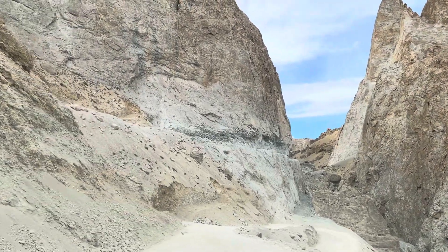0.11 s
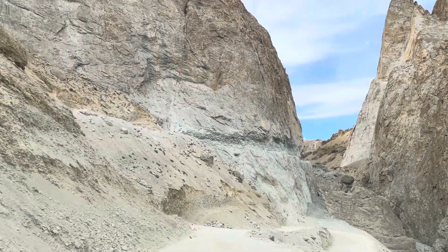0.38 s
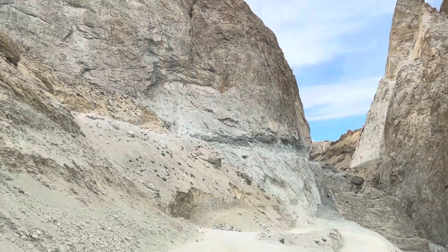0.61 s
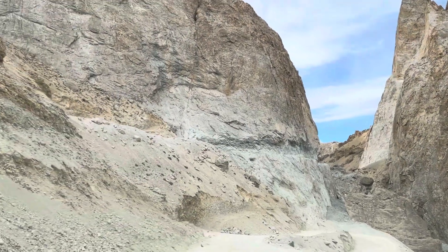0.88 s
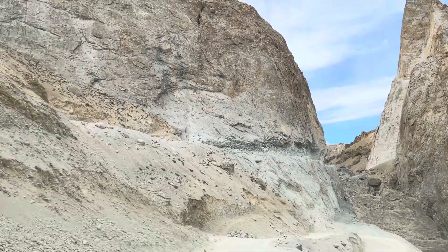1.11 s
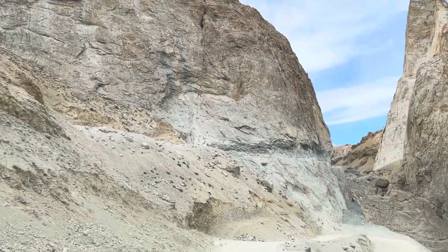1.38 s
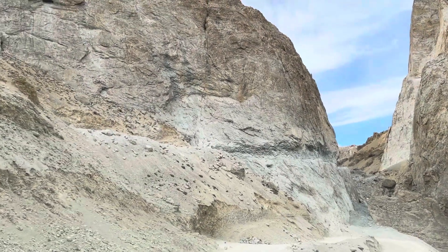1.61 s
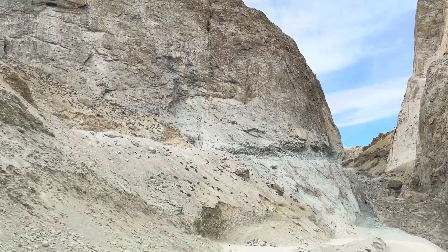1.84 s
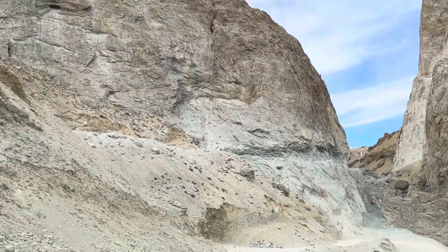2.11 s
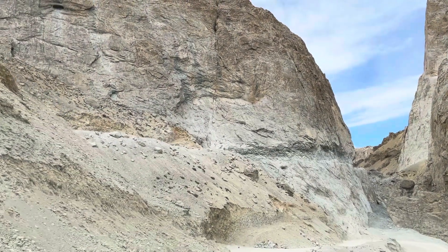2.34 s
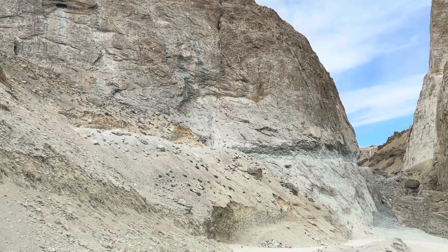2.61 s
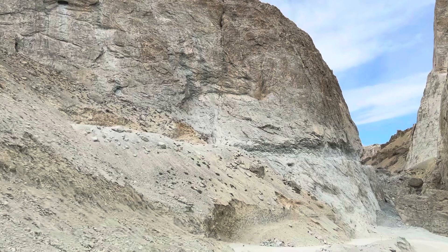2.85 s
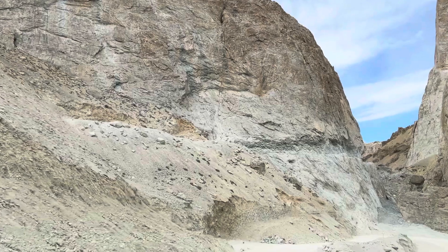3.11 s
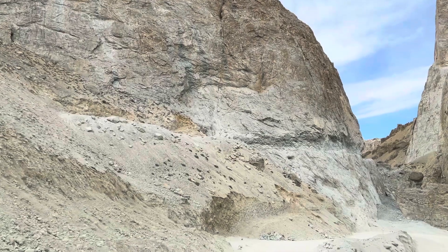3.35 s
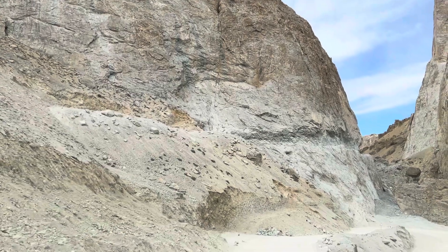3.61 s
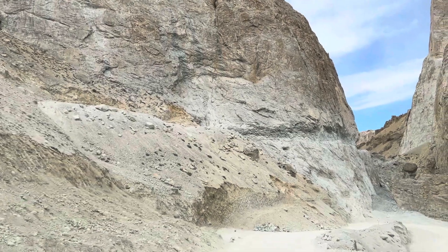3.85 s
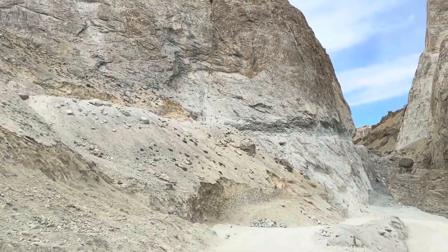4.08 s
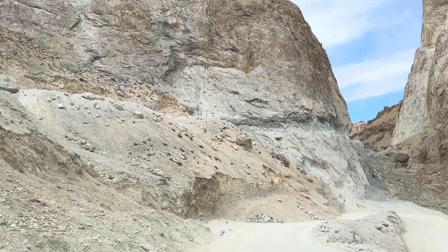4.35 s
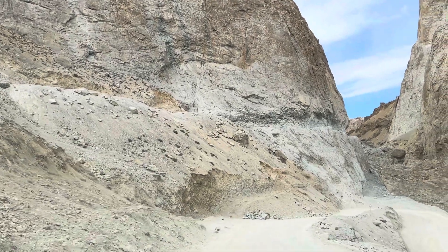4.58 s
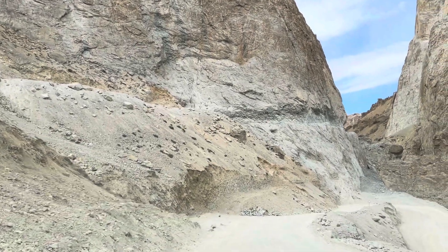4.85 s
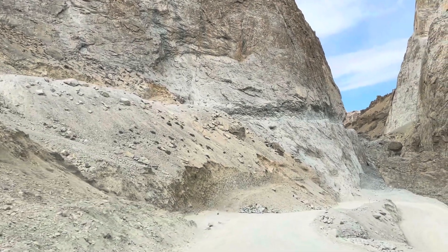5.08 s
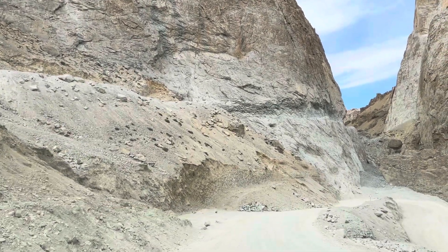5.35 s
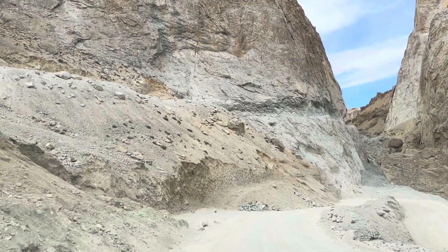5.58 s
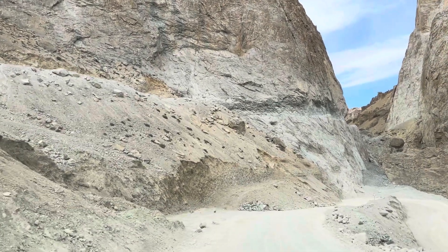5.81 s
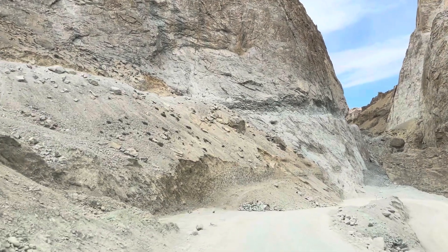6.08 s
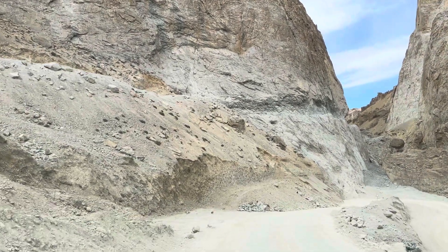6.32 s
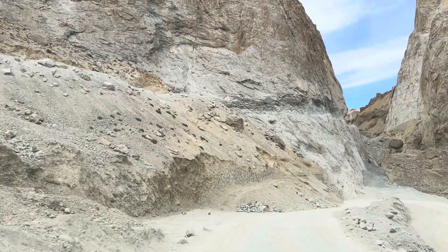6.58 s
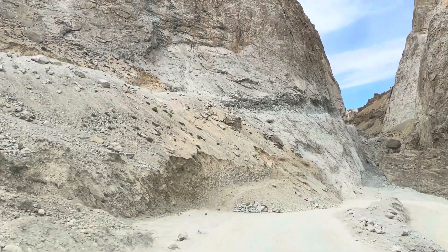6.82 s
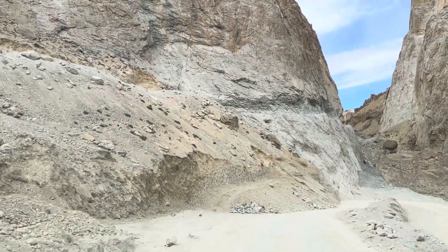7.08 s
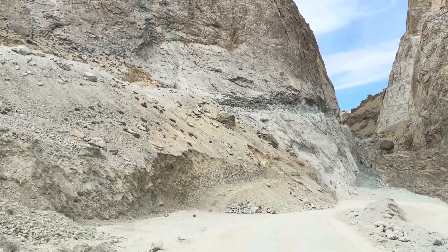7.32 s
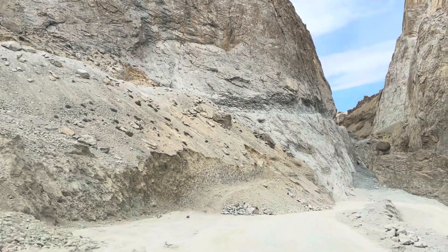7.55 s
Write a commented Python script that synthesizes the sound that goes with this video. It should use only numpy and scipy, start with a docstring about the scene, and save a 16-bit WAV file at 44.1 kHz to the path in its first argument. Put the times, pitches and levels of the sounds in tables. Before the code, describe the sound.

Inside a vehicle moving steadily on a rough gravel road, for about 7.7 seconds. A deep boom near 60 hertz wavers in pitch and strength, swelling around 1.1, 2.4, 4.3 and 6 seconds, over constant low body shake. Tyre rumble and gritty hiss rise and fall with the surface, brighter around 1.6, duller just after 3.2, rougher near 5 to 5.5. Stones clack and crunch on the floor throughout, with brief dry rings. Soft thumps land at 1.1 and 1.9, bunch from 2.5 to 3, then return at 5, 5.5 and 7.5. Tiny metal jingles appear at 0.4, 0.9, 2.1, 3, 5 and 7.3; a loose fitting ticks in little runs, clearest at 4.3 to 5.4. A faint gear whine glides upward at 1.25 to 2, then returns higher from 6.75, dipping before rising to the end. Close, dry stereo cabin sound.

```python
"""Cabin on a rough gravel road

Heard inside a rolling vehicle. The cabin booms as a wavering low sine; the body's shake and the tyres' rumble
and hiss are shaped noise. Stones knock the floor pan, small metal parts jingle, a loose fitting ticks and bumps
thump the body: all are clicks that ring short modes. A gear whines faintly in two stretches, as a gliding sine."""
import sys
import numpy as np
from scipy import signal
from scipy.fft import rfft, irfft
from scipy.io import wavfile

SR = 44100
rng = np.random.default_rng(int(sys.argv[2]) if len(sys.argv) > 2 else 0)


def generate_wav(signal):
    """Clip the signal to [-1, 1] and save it as 16-bit WAV at the path in sys.argv[1]."""
    frames = np.transpose(np.atleast_2d(signal))
    scaled = np.clip(frames, -1, 1) * 32767
    pcm = np.round(scaled).astype(np.int16)
    wavfile.write(sys.argv[1], SR, pcm)


def convert_level_to_amplitude(level_db):
    """Map a level in decibels to its linear amplitude factor."""
    exponent = np.asarray(level_db, float) / 20
    return 10 ** exponent


N = 339129

# roughness of the road, as the level of the gravel hiss: t/s, level/dB
ROUGHNESS_LEVEL = [(0.0, -51), (0.96, -54.5), (1.201, -47), (1.451, -56.5), (1.619, -52.5), (1.9, -51.5),
                   (2.97, -55), (3.221, -57), (3.92, -56.5), (4.399, -52), (4.849, -54), (4.961, -48),
                   (5.15, -46), (5.27, -55), (5.55, -46), (5.68, -60), (5.97, -51.5), (6.427, -57),
                   (7.69, -48.5)]


def in_time(rows):
    """Table columns joined by straight lines, one value a sample."""
    s, *columns = np.transpose(rows)
    return [np.interp(np.arange(N) / SR, s, c) for c in columns]


def at_hz(points, hz):
    """A spectrum read on a log-frequency axis."""
    point_hz, values = np.transpose(points)
    return np.interp(np.log(hz), np.log(point_hz), values)


def rms_one(x):
    """Scaled to unit power."""
    return x / np.sqrt(np.mean(x ** 2) + 1e-20)


def drift(rate_hz):
    """Slow random wandering of spread 1: noise through two equal low-pass poles at rate_hz."""
    every = 40  # samples from one drawn value to the next
    r = np.exp(-2 * np.pi * rate_hz * every / SR)
    settle = 2000
    white = rng.standard_normal(N // every + 2 + settle)
    slow = signal.lfilter([1], [1, -2 * r, r * r], white)[settle:]
    return np.interp(np.arange(N) / every, np.arange(len(slow)), rms_one(slow))


def ring(clicks, hz, t60, lead=0.):
    """A unit click sets a decaying sine of height 1 ringing, its phase advanced by lead (rad)."""
    r = convert_level_to_amplitude(-60 / (max(t60, .002) * SR))
    w = 2 * np.pi * hz / SR
    return signal.lfilter([np.sin(lead), r * np.sin(w - lead)], [1, -2 * r * np.cos(w), r * r], clicks + 1e-18)


def tone(hz, level_db, waver_hz, flutter_db, rate_hz):
    """A sine that wavers in pitch and flutters in level."""
    phase = 2 * np.pi * np.cumsum(hz + waver_hz * drift(rate_hz)) / SR
    return np.sqrt(2) * convert_level_to_amplitude(level_db + flutter_db * drift(rate_hz)) * np.sin(phase)


def coloured(spectrum, mid_side_noise, patchy_db, rate_hz):
    """Stereo noise in overlapping octave patches that flicker, its left-right likeness set by pitch; rms 1."""
    # left-right likeness of the noise: f/Hz, correlation (-1 to 1)
    likeness = [(60, 0.96), (120, 0.98), (250, 0.74), (520, 0.071), (1080, -0.63), (2220, 0.32),
                (4560, 0.21), (9390, 0.24)]
    low_hz, high_hz = spectrum[0][0], spectrum[-1][0]
    hz = np.maximum(np.fft.rfftfreq(N, 1 / SR), 1)
    alike = np.clip(at_hz(likeness, hz), -1, 1)
    inside = (hz > low_hz) & (hz < high_hz)
    shaped = rfft(mid_side_noise) * convert_level_to_amplitude(at_hz(spectrum, hz)) * inside
    mid, side = shaped * np.sqrt([1 + alike, 1 - alike])
    left_right = np.array([mid + side, mid - side])
    out, together = 0, drift(rate_hz)
    for centre in low_hz * 2. ** np.arange(np.log2(high_hz / low_hz) + 1):
        patch = np.cos(np.pi / 2 * np.clip(np.log2(hz / centre), -1, 1)) ** 2
        flicker_db = patchy_db * (together + 1.43 * drift(rate_hz))
        out = out + irfft(patch * left_right, N) * convert_level_to_amplitude(flicker_db)
    return rms_one(out)


def boom():
    """Cabin air and floor boom as one low sine, nearly even at the two ports."""
    # path of the boom: t/s, f/Hz, level/dB
    boom_path = [(0, 59.8, -18.5), (.3, 59.76, -24), (.6, 54.2, -22.5), (.86, 60.3, -24),
                 (1.11, 60.23, -14.5), (1.5, 63.54, -25), (1.85, 61, -19.5), (2.05, 59.95, -22.5),
                 (2.4, 62.09, -16), (2.96, 55.76, -22), (3.6, 65, -27), (4.1, 61, -18), (4.6, 64.06, -18),
                 (5.4, 55.03, -24), (6.0, 59.03, -17.5), (6.3, 62, -24), (6.75, 65.07, -18),
                 (7.39, 58.06, -17), (7.69, 56.07, -29)]
    return tone(*in_time(boom_path), waver_hz=2.2, flutter_db=3., rate_hz=5.) * convert_level_to_amplitude([[-.2], [.2]])


def shake():
    """The body's low shake: steady noise whose patches flicker slightly."""
    # spectrum of the shake: f/Hz, relative level per Hz/dB
    shake_spectrum = [(12, -33), (24, -9), (41, 1.5), (50, -0.5), (62, -4.5), (76, -1.5), (90, -2.5),
                      (108, -1), (125, -8), (170, -20), (220, -45), (370, -120)]
    white = rng.standard_normal((2, N))
    return convert_level_to_amplitude(-17.5) * coloured(shake_spectrum, white, patchy_db=.8, rate_hz=4.)


def rumble():
    """Tyre rumble: low noise that follows the roughness with a part of the hiss's swing."""
    # spectrum of the rumble: f/Hz, relative level per Hz/dB
    rumble_spectrum = [(82, -31.5), (140, -1.5), (164, -2.5), (195, -11), (253, -9.5), (301, -17),
                       (425, -18), (775, -32.5), (1000, -45), (1300, -58.5), (2200, -120)]
    mean_db, follows = -29.5, 0.66  # level at mean roughness; share of the hiss's swing in dB
    rough_db, = in_time(ROUGHNESS_LEVEL)
    level_db = mean_db + follows * (rough_db - rough_db.mean())
    white = rng.standard_normal((2, N))
    return convert_level_to_amplitude(level_db + [[-.6], [.6]]) * coloured(rumble_spectrum, white, patchy_db=1.8, rate_hz=8.)


def grit(per_s, spread_db, cycles):
    """Small stones tick in clumps, each ringing some cycles at one of twelve pitches, as mid and side signals."""
    born = rng.random(N) < per_s * convert_level_to_amplitude(4 * drift(20.)) / SR
    sizes = convert_level_to_amplitude(spread_db * np.minimum(rng.exponential(1, N), 2.3))
    clicks = born * sizes * rng.standard_normal((2, N))
    pitches = np.geomspace(1100, 4500, 12)
    dealt = rng.integers(0, 12, N)
    return rms_one(sum(ring(clicks * (dealt == k), hz, cycles / hz) * np.sqrt(hz) for k, hz in enumerate(pitches)))


def hiss():
    """Gravel hiss under the tyres: part smooth noise, part grit, growing with roughness; its treble has its own path."""
    # spectrum of the hiss: f/Hz, relative level per Hz/dB
    hiss_spectrum = [(410, -30), (700, -23.5), (864, -6), (1390, -13.5), (2000, -17.5), (3120, -22.5),
                     (4110, -24.5), (4740, -24.5), (6980, -25), (8520, -25), (9210, -22.5), (9840, -37),
                     (12800, -79), (21600, -120)]
    # gain on the treble of the hiss: t/s, level/dB
    treble_gain = [(0, 3), (1.45, 0), (1.6, 7.5), (1.72, -1), (3.15, 0.5), (3.26, -14), (3.36, -8),
                   (3.45, -3.5), (3.55, -2.5), (4.2, -3), (4.35, -1.5), (5.2, -2.5), (5.3, -3), (5.5, -2.5),
                   (5.75, 0.5), (6.3, -4), (6.7, -1.5), (7.69, -2.5)]
    treble_from_hz = 2700
    gravel = rng.standard_normal((2, N)) + 0.4 * grit(per_s=500., spread_db=3.2, cycles=14.)
    level_db, = in_time(ROUGHNESS_LEVEL)
    full = convert_level_to_amplitude(level_db) * coloured(hiss_spectrum, gravel, patchy_db=1.2, rate_hz=12.)
    low = signal.sosfiltfilt(signal.butter(2, treble_from_hz, fs=SR, output="sos"), full)
    return low + convert_level_to_amplitude(*in_time(treble_gain)) * (full - low)


def small_stones():
    """Rows like those of the loud stones, at chance moments, louder where the road is rough."""
    per_s, level_db, thud_db, crack_db, crunch = 5.1, -55, -2.5, -16.5, .2  # typical values
    count = int(per_s * N / SR)
    s = rng.uniform(.05, N / SR - .05, count)
    luck = rng.standard_normal((3, count))
    when, rough_db = np.transpose(ROUGHNESS_LEVEL)
    stone_db = level_db + np.interp(s, when, rough_db) - rough_db.mean() + 3 * luck[0]
    return np.transpose([s, stone_db, thud_db + 4 * luck[1], crack_db + 5 * luck[2], crunch + 0 * s])


def stones():
    """Each stone is a hard click with a short crunch behind it into the pan modes; the right port hears lows late."""
    # the loudest stones: t/s, level/dB, thud and crack relative to the knock/dB, crunch (0-1)
    loud_stones = [(0.0378, -32.5, -4, -17, 0.38), (0.1371, -35, -20, -24.5, 0.43),
                   (0.1545, -31, -21, -24, 0.33), (0.2104, -35.5, -1, -18, 0.88),
                   (0.2578, -56, -6.5, -11, 0.19), (0.3107, -39.5, -6, -18.5, 0.61),
                   (0.3321, -51, -11, -25, 0.26), (0.4838, -34, -1, -12.5, 0.81),
                   (0.6554, -33.5, -14.5, -16.5, 0.48), (1.0096, -35.5, -8.5, -21, 0.42),
                   (1.077, -38, -15, -15, 0.73), (1.1119, -43, 4, -18, 0.24),
                   (1.1238, -36.5, -10, -21, 0.3), (1.1578, -39.5, -7, -12, 0.4),
                   (1.1618, -38.5, -5.5, -7, 0.51), (1.1937, -37.5, 9, -11.5, 0.31),
                   (1.282, -30.5, -9.5, -20.5, 0.91), (1.3957, -29.5, -22, -26.5, 0.34),
                   (1.5883, -32.5, -18, -26, 0.49), (1.7345, -41.5, 8, -22, 0.27),
                   (1.7464, -33, 2, -16, 0.3), (1.8871, -33.5, -1, -11.5, 0.26),
                   (1.8946, -32.5, -2, -13.5, 0.53), (2.0637, -35.5, -8.5, -14.5, 0.67),
                   (2.2453, -40, -8, -9, 0.51), (2.2613, -36.5, -17.5, -25.5, 0.39),
                   (2.3092, -41.5, -16.5, -6, 0.91), (2.4623, -44, 1, -14, 0.7),
                   (2.5057, -35, -12, -16, 0.35), (2.5304, -51.5, -4, -5, 0.33),
                   (2.5681, -49, -8.5, -20, 0.33), (2.6409, -39, -4, -23, 0.33),
                   (2.6798, -34.5, 6, -23.5, 0.9), (2.7644, -42, 14, -14.5, 0.3),
                   (2.794, -39.5, -14, -18.5, 0.71), (2.8335, -38, -17, -17, 0.42),
                   (2.8754, -37, -15, -26.5, 0.3), (2.9657, -39.5, -6.5, -29, 0.46),
                   (2.9814, -55.5, 14, -15, 0.59), (3.0106, -41, -4, -12, 0.41),
                   (3.3014, -55, 1.5, -24, 0.49), (3.3268, -41.5, -4, -21.5, 0.29),
                   (3.3732, -42.5, -4, -32, 0.4), (3.4755, -50, -3, -17, 0.3), (3.6356, -38, -2, -24, 0.62),
                   (3.8267, -33, -10.5, -30.5, 0.38), (4.0138, -36.5, 4.5, -14.5, 0.49),
                   (4.0542, -46, -6, -21, 0.23), (4.2004, -44, 10, -4, 0.3), (4.2348, -34, 5, -16.5, 0.49),
                   (4.2772, -46, -0.5, -13.5, 0.3), (4.2996, -33, -4.5, -12, 0.87),
                   (4.376, -40, 15, -14, 0.51), (4.4004, -39, -1, -21, 0.3), (4.5376, -47, -12, -2, 0.11),
                   (4.6254, -39, -7, -12, 0.59), (4.7037, -32, -14.5, -19, 0.5),
                   (4.8743, -49, -13, -3.5, 0.34), (4.9197, -57, 4, -17, 0.3), (4.9412, -31, 1, -16, 0.32),
                   (4.9616, -34, -2, -9, 0.67), (5.004, -33, 0, -21, 0.37), (5.0853, -43.5, -9, -9, 0.27),
                   (5.1377, -32, 4.5, -15.5, 0.24), (5.2734, -41.5, 9, -34, 0.3),
                   (5.3702, -45, -3, -4.5, 0.3), (5.4959, -39.5, -7, -7.5, 0.3),
                   (5.5323, -32, 3.5, -16, 0.45), (5.5508, -34.5, -9, -5.5, 0.3),
                   (5.6216, -38, -2.5, -16, 0.38), (5.658, -39, 5, -26.5, 0.1),
                   (5.8471, -40.5, -5, -10.5, 0.74), (5.9294, -32, -5.5, -32, 0.87),
                   (5.9634, -48, 10.5, 2.5, 0.24), (6.1524, -39.5, -17.5, -8.5, 0.41),
                   (6.5425, -43.5, -2.5, -7, 0.34), (6.6064, -43, -0.5, -11, 0.74),
                   (6.6593, -38.5, -4, -8, 0.8), (6.7236, -38.5, 0.5, -11.5, 0.48),
                   (6.9414, -43, -6, -16, 0.33), (7.0928, -39.5, -9.5, -5.5, 0.24),
                   (7.1646, -42.5, -15, -3, 0.41), (7.2714, -36, 4, -10.5, 0.16),
                   (7.3028, -32, -2, -24.5, 0.69), (7.3951, -29.5, -2, -23.5, 0.41),
                   (7.4649, -39.5, 1.5, -2.5, 0.3), (7.5313, -36.5, -0.5, -23, 0.49),
                   (7.5822, -36, 4.5, -11, 0.24), (7.636, -38.5, -3, -19.5, 0.42)]
    # the floor pan rings briefly: f/Hz, level/dB, t60/s
    pan_modes = [(274, -2, 0.023), (550, 4, 0.015), (700, 3.5, 0.0099), (1010, 5, 0.012), (1270, 5, 0.0031),
                 (1460, 1.5, 0.0094), (1950, -5, 0.015), (2430, -4.5, 0.0079), (2690, -4.5, 0.003),
                 (4000, -3, 0.0057), (5900, 2.5, 0.0026), (8360, 3.5, 0.0053), (10000, -5.5, 0.0017)]
    # where thud, knock and crack sit: f/Hz
    knock_hz = [800, 2300, 6000]
    crunch_s, crunch_db = .006, -10  # decay time constant; level at full crunch
    lag_range_s, lag_under_hz = (.00015, .00045), 2200
    s, level_db, thud_db, crack_db, crumbly = np.vstack([loud_stones, small_stones()]).T
    # three noises a stone: one common to both ports, one for each
    crunch = rng.standard_normal((len(s), 3, 500)) * np.exp(-np.arange(500) / (crunch_s * SR))
    crunch *= convert_level_to_amplitude(crunch_db) * np.clip(crumbly, 0, 1)[:, None, None] ** 2
    crunch[:, :, 0] = 0.38  # the click itself
    ports = crunch[:, :1] + 0.35 * crunch[:, 1:]
    ports = np.pad(ports, [(0, 0), (0, 0), (0, 1000)])
    luck_db = rng.normal(0, 2., (len(s), len(pan_modes)))
    late_s = rng.uniform(*lag_range_s, len(s))
    out = np.zeros((2, N + 2000))
    for k, (hz, mode_db, t60) in enumerate(pan_modes):
        colour_db = [np.interp(np.log(hz), np.log(knock_hz), [a, 0, b]) for a, b in zip(thud_db, crack_db)]
        sizes = convert_level_to_amplitude(level_db + mode_db + colour_db + luck_db[:, k]) * (-1) ** k
        rings = ring(ports, hz, t60)
        rings = rings * (sizes / np.abs(rings).max(axis=(1, 2)))[:, None, None]
        for side, lag_s in enumerate((0, late_s * (hz < lag_under_hz))):
            at = np.round((s + lag_s) * SR).astype(int)[:, None] + np.arange(1500)
            out[side] += np.bincount(at.ravel(), rings[:, side].ravel(), N + 2000)
    return out[:, :N]


def strikes(times, sizes, bounces):
    """Clicks at the given times, each followed by further touches: (nominal seconds late, nominal share)."""
    out = np.zeros(N + SR)
    at = np.round(np.asarray(times) * SR).astype(int)
    out[at] = sizes
    for late_s, share in bounces:
        uneven = rng.uniform(0.91, 0.93, (len(at), 2))  # scales both delay and share
        out[at + (late_s * uneven[:, 0] * SR).astype(int)] += share * uneven[:, 1] * sizes
    return out[:N]


def rattle(times, level_db, modes, bounces, strongest_hz=None, focus_db=0., swells=True):
    """Touches ring a part's modes, each mode with a new strength each time and its own phase at the left port."""
    swell_s = .008  # t60 of a first ring that feeds the second, so the sound swells up
    out = np.zeros((2, N))
    for hz, mode_db, t60, lead in modes:
        # focus_db is lost per kHz away from the strongest pitch
        away_db = 0 if strongest_hz is None else -focus_db * np.abs(hz - strongest_hz) / 1000
        luck_db = rng.normal(0, 3.5, len(times))
        clicks = strikes(times, convert_level_to_amplitude(level_db + mode_db + away_db + luck_db), bounces)
        if swells:
            clicks = ring(clicks, hz, swell_s) * 2 * np.log(1000) / (swell_s * SR)
        out += [ring(clicks, hz, t60, lead), ring(clicks, hz, t60)]
    return out


def runs(rows, gap_s):
    """Nearly even touches that swell to a crest and fade; gives times, levels and the rest of each run's row."""
    crest, fade_db, jitter_s = .35, 6, .002  # loudest share into a run; loss over half a run; unevenness
    out = []
    for start_s, length_s, level_db, *rest in rows:
        count = int(round(length_s / gap_s))
        for along in np.linspace(0, 1, count + 1):
            lost_db = fade_db * 2 * abs(along - crest) * (count > 0)
            uneven_s = jitter_s * rng.normal() * (0 < along < 1)
            out.append((start_s + along * length_s + uneven_s, level_db - lost_db, *rest))
    return np.transpose(out)


def jingles():
    """Small metal parts jingle singly or in runs: clustered touches ring high modes, focused near one pitch."""
    # runs of jingles: t/s, length/s, level/dB, strongest f/Hz
    jingle_runs = [(.07, 0, -50, 9530), (.301, 0, -46.5, 8130), (.408, .176, -47, 9550),
                   (.862, 0, -40.5, 7980), (1.767, 0, -51.5, 9200), (1.871, 0, -57, 8500),
                   (1.975, 0, -53.5, 9230), (2.072, .104, -49, 8840), (2.331, 0, -53, 9050),
                   (2.533, 0, -55.5, 9170), (2.769, 0, -54.5, 9270), (2.991, .133, -50, 9440),
                   (3.142, 0, -49, 8150), (3.663, 0, -51.5, 9700), (5.027, .179, -46, 9580),
                   (5.435, 0, -53, 9600), (6.596, 0, -49.5, 7880), (6.925, .132, -48, 9340),
                   (7.282, .176, -41.5, 9720), (7.552, .061, -49, 9400)]
    # modes of the parts: f/Hz, level/dB, t60/s, left lead/rad
    jingle_modes = [(8150, -2, .022, .2), (8420, 0, .025, .2), (8680, 0, .025, .2), (8950, 0, .025, .4),
                    (9230, 0, .03, .6), (9600, -1, .025, 2.0), (9920, 1, .03, 2.8), (11200, -6, .025, .3)]
    s, level_db, strongest_hz = runs(jingle_runs, gap_s=.046)
    touches = [(.0015, 1.6), (.0035, 1.6), (.006, 1.3), (.010, 0.8)]
    return rattle(s, level_db, jingle_modes, touches, strongest_hz, focus_db=18.)


def ticks():
    """A loose fitting ticks singly or in runs while it swings; each touch bounces twice."""
    # runs of ticks: t/s, length/s, level/dB
    tick_runs = [(.211, .047, -48), (.623, .212, -49), (1.335, 0, -53), (2.104, 0, -52), (2.706, .042, -47),
                 (3.561, .248, -56), (4.321, .134, -44), (4.94, .205, -42), (5.264, 0, -55),
                 (5.415, 0, -42), (5.914, .08, -56), (6.68, .085, -49)]
    # modes of the fitting: f/Hz, level/dB, t60/s, left lead/rad
    tick_modes = [(1570, -1, .03, 3.0), (1980, -2, .015, 1.0), (2500, -5, .012, .8), (4090, 1, .03, .6),
                  (6170, -14, .015, .3)]
    s, level_db = runs(tick_runs, gap_s=.042)
    return rattle(s, level_db, tick_modes, [(.002, 0.83), (.004, 0.8)]) * convert_level_to_amplitude([[1.2], [-1.2]])


def thumps():
    """Bumps thump the body: single clicks ring its low modes, softened by a low-pass as a soft contact."""
    # bumps: t/s, level/dB
    bumps = [(1.134, -24), (1.884, -22.5), (2.464, -23.5), (2.528, -26), (2.683, -34.5), (2.767, -29),
             (2.831, -24.5), (2.981, -28), (5.019, -21.5), (5.067, -28.5), (5.526, -22.5), (5.633, -30),
             (7.539, -26)]
    # modes of the body: f/Hz, level/dB, t60/s, left lead/rad
    body_modes = [(186, 1.5, 0.053, 0.014), (263.4, 4.5, 0.043, 0.0094), (377, -6, 0.03, 0.00082)]
    soft_hz = 700
    hard = rattle(*np.transpose(bumps), body_modes, [], swells=False)
    return signal.sosfilt(signal.butter(2, soft_hz, fs=SR, output="sos"), hard)


def whine():
    """A gear whines faintly in two stretches: a gliding sine, stronger at the right port."""
    # one list for each stretch: t/s, f/Hz, level/dB
    whine_paths = [
        [(1.25, 400, -59), (1.5, 419.3, -47), (1.75, 426.3, -45), (2.0, 435.6, -56)],
        [(6.75, 507.2, -51), (6.95, 490, -49), (7.05, 495, -60), (7.2, 497, -44), (7.4, 518, -50),
         (7.64, 528, -44)],
    ]
    edge_s, faint_db = .05, -80  # fade at either end
    out = 0
    for rows in whine_paths:
        before = (rows[0][0] - edge_s, rows[0][1], faint_db)
        after = (rows[-1][0] + edge_s, rows[-1][1], faint_db)
        out = out + tone(*in_time([before, *rows, after]), waver_hz=5, flutter_db=2, rate_hz=20)
    return out * convert_level_to_amplitude([[-3.], [3.]])


def scene():
    """All sources as the two ports hear them."""
    road = shake() + rumble() + hiss()
    return boom() + road + stones() + jingles() + ticks() + thumps() + whine()


def band_limit(x):
    """A steep low-pass at the top of the band."""
    return signal.sosfilt(signal.butter(12, 12400, fs=SR, output="sos"), x)


def record(dry):
    """Peaks are rounded, both channels alike."""
    rounded = 0.93 * np.tanh(dry / 0.81)
    return band_limit(rounded)


dry = scene()
out = record(dry)
generate_wav(out)
```